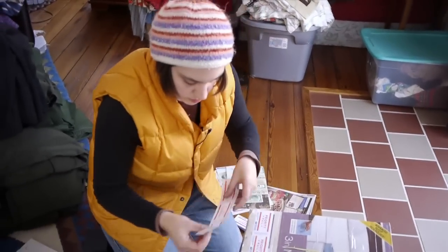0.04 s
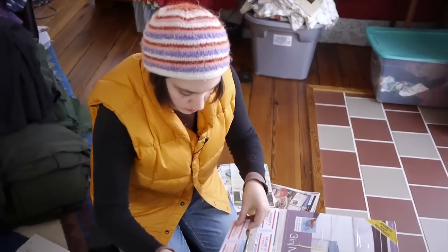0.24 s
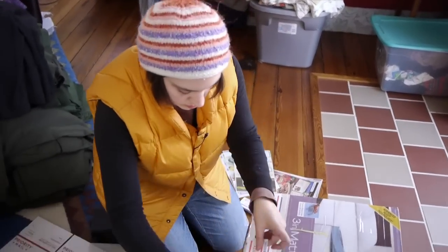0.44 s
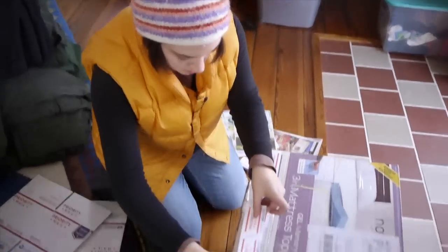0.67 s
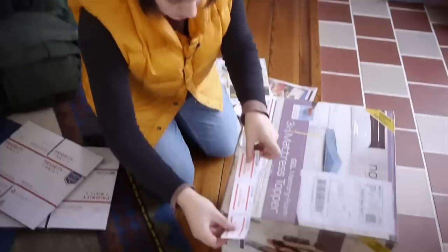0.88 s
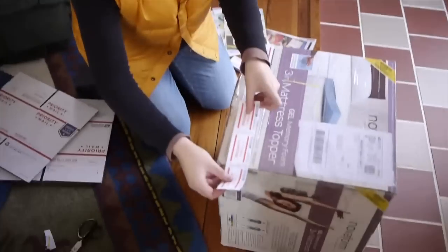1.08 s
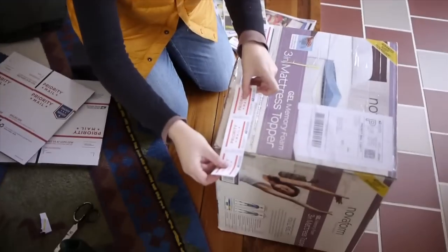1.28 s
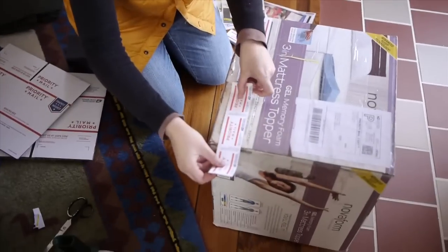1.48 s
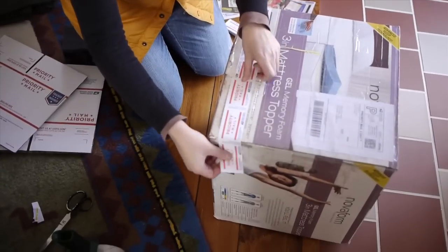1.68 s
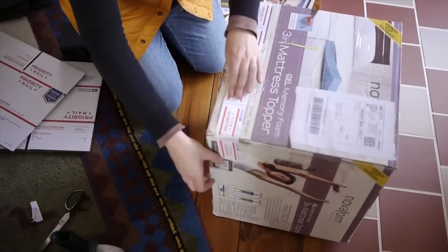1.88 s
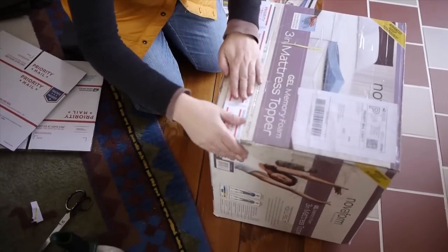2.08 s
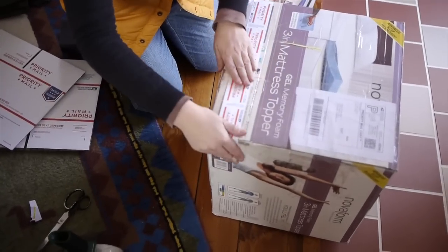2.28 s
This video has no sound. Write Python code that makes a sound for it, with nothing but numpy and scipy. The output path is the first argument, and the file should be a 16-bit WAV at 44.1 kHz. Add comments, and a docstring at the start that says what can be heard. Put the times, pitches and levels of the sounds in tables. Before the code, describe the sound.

A sticker peels off its paper backing with crisp rustling and soft box knocks, then a quiet lull, then sharp crackling taps and a hollow thump on a cardboard box, close-miked in a small quiet room.

```python
"""A sticker label is peeled and laid on a cardboard box in a small, quiet room.
First the backing peels in dense grains of noise, while soft knocks jostle the box and stiff snaps begin.
Paper rustles as the box rumbles and scrapes briefly over the floor; then there is a short lull.
Fingers smooth and tap the label, which cracks, rings and buzzes, and fingertips drag on the cardboard.
Last a flat hand thumps the hollow lid: a bending panel pulse with decaying box modes."""
import sys
import numpy as np
from scipy import signal
from scipy.fft import rfft, irfft, next_fast_len
from scipy.io import wavfile
from scipy.ndimage import uniform_filter1d

SR = 44100
rng = np.random.default_rng(int(sys.argv[2]) if len(sys.argv) > 2 else 0)


def wrap_up_sound(samples):
    """Save the sound to the file named by the first command line argument, as 16-bit audio."""
    columns = np.atleast_2d(samples).T
    # keep every value between -1 and 1, then stretch to whole-number steps
    tamed = np.clip(columns, -1, 1)
    steps = np.round(tamed * 32767).astype(np.int16)
    wavfile.write(sys.argv[1], SR, steps)


N = 102929


def undb(db):
    """Turn decibels into an amplitude factor."""
    return 10 ** (np.asarray(db) / 20)


def unit(x):
    """Scale a sound to an RMS of one."""
    return x / np.sqrt(np.mean(x ** 2) + 1e-20)


def blow(x):
    """Scale a short sound so that its energy equals 5 ms at full level."""
    return x * np.sqrt(0.005 * SR / np.sum(x ** 2))


def colour(x, points, tilt_db=0):
    """Causal minimum-phase filter through (Hz, dB) points, tilted by dB per octave about 4 kHz."""
    size = next_fast_len(2 * len(x))
    hz = np.maximum(np.arange(size // 2 + 1) * SR / size, 1)
    point_hz, point_db = np.array(points, float).T
    gain_db = np.interp(np.log(hz), np.log(point_hz), point_db)
    gain_db = gain_db + tilt_db * np.log2(np.clip(hz, 500, 9000) / 4000)
    # folding the cepstrum onto positive time makes the filter causal
    cepstrum = irfft(np.log(undb(gain_db)), size)
    cepstrum[1:size // 2] *= 2
    cepstrum[size // 2 + 1:] = 0
    response = np.exp(rfft(cepstrum))
    return irfft(rfft(x, size) * response, size)[:len(x)]


def curve(points):
    """Gain that follows (s, dB) points and sits at -120 dB outside them."""
    times, levels_db = np.array(points).T
    return undb(np.interp(np.arange(N) / SR, times, levels_db, left=-120, right=-120))


def fade(t, t60):
    """Exponential decay that falls 60 dB in t60 seconds."""
    return np.exp(-np.log(1000) * t / t60)


def add(out, start_s, x):
    """Mix a short sound into out at its start time."""
    i = max(int(start_s * SR), 0)
    out[i:i + len(x)] += x[:len(out) - i]


def walk(rate_hz):
    """Random levels, rate_hz new ones a second, with straight glides between them."""
    hold = max(int(SR / rate_hz), 1)
    steps = np.repeat(rng.standard_normal(N // hold + 1), hold)
    return unit(uniform_filter1d(steps, hold)[:N])


def friction(levels, points, flutter_db, grains_per_s=6000, spread_db=1.5):
    """Dense tiny slips of fibres, coming in uneven bunches, coloured and faded along a curve."""
    slipping = rng.random(N) < grains_per_s / SR
    strength = undb(spread_db * np.minimum(rng.exponential(size=N), 5))
    slips = slipping * rng.choice([-1, 1], N) * strength
    bunched = slips * undb(flutter_db * walk(180))
    return unit(colour(bunched, points)) * curve(levels)


# spectrum of the quiet room: pitch_hz [Hz], relative_level_db [dB per Hz]
FLOOR_COLOUR = [(15, -82), (25, -57), (43, -4.5), (172, -3.5), (286, -12), (354, -6), (833, -16),
                (15000, -28)]


def room_floor():
    """Steady background of the room: coloured noise at a constant level."""
    return undb(-60.5) * unit(colour(rng.standard_normal(N), FLOOR_COLOUR))


def room_reflections(x):
    """Short, scattered reflections of a furnished room: a noise tail that swells in, then decays."""
    t = np.arange(SR // 2) / SR
    swell = np.minimum(t / 0.0061, 1)
    tail = rng.standard_normal(len(t)) * fade(t, 0.12) * swell
    return signal.fftconvolve(x, tail / np.sqrt(np.sum(tail ** 2)))[:N]


# level curve of the handled box's low rumble: time_s [s], level_db [dB]
RUMBLE_LEVELS = [(0, -50), (.04, -46.5), (.13, -40.5), (.19, -61), (.25, -41.5), (.33, -40), (.42, -68),
                 (.6, -59.5), (.84, -56), (.89, -72), (1.45, -68.5), (1.56, -54.5), (1.7, -58),
                 (1.8, -54.5), (1.87, -39.5), (1.97, -48.5), (2.07, -60), (2.13, -53), (2.19, -39),
                 (2.26, -46.5), (2.37, -72)]
# spectrum of the rumble: pitch_hz [Hz], relative_level_db [dB]
RUMBLE_TONE = [(25, -40), (55, 6), (110, 4), (180, 5), (300, -4.5), (520, -5), (900, -31), (3000, -20)]


def box_rumble():
    """Low rumble of the handled box: slips with strong flutter, coloured towards the bass."""
    return friction(RUMBLE_LEVELS, RUMBLE_TONE, flutter_db=5.0)


# level curve of the box scraping over the floor: time_s [s], level_db [dB]
SCRAPE_LEVELS = [(.2, -55.5), (.3, -55), (.39, -43), (.45, -43), (.54, -43.5), (.62, -48), (.72, -55),
                 (.845, -54.5), (.87, -79)]
# spectrum of the scrape: pitch_hz [Hz], relative_level_db [dB]
SCRAPE_TONE = [(60, -8), (150, -1), (450, 3.5), (800, -0.5), (1200, -4.5), (1820, 0), (2000, 6),
               (2200, 0.5), (2800, -3.5), (3900, -11), (4950, -6.5), (5800, -11), (13000, -24)]


def floor_scrape():
    """Cardboard slipping over the floor in dense, nearly even grains."""
    return friction(SCRAPE_LEVELS, SCRAPE_TONE, flutter_db=0.5)


# level curve of fingers smoothing the label: time_s [s], level_db [dB]
SMOOTH_LEVELS = [(1.25, -66.5), (1.46, -56), (1.53, -54.5), (1.57, -47.5), (1.62, -55), (1.69, -55),
                 (1.8, -56.5), (1.89, -71), (1.94, -39.5), (1.99, -51.5), (2.05, -59), (2.12, -50.5),
                 (2.16, -48), (2.19, -52), (2.23, -51), (2.28, -53.5), (2.37, -39)]
# spectrum of the smoothing: pitch_hz [Hz], relative_level_db [dB]
SMOOTH_TONE = [(100, -1), (400, 12), (900, 7.5), (1800, 4), (3500, 1.5), (8000, 0.5), (11000, -3.5)]


def finger_smoothing():
    """Fingers rubbing the label flat: dense slips with light flutter."""
    return friction(SMOOTH_LEVELS, SMOOTH_TONE, flutter_db=1.0)


# level curve of fingertips dragging on the cardboard: time_s [s], level_db [dB]
DRAG_LEVELS = [(1.82, -70), (1.865, -54), (1.875, -51), (1.91, -38), (1.935, -47), (1.97, -54.5),
               (2.04, -65), (2.1, -58.5), (2.135, -46.5), (2.15, -46), (2.19, -74)]
# spectrum of the drag: pitch_hz [Hz], relative_level_db [dB]
DRAG_TONE = [(150, -3), (350, 1), (510, 10), (700, -7), (1100, -23), (1650, 7), (2200, -14), (4000, -18),
             (8000, -14)]


def fingertip_drag():
    """Fingertips catching on cardboard: slips in markedly uneven bunches."""
    return friction(DRAG_LEVELS, DRAG_TONE, flutter_db=4.0)


# level curve of the paper rustle, before the treble trim: time_s [s], level_db [dB]
RUSTLE_LEVELS = [(.19, -57), (.23, -45.5), (.3, -37.5), (.36, -37.5), (.4, -40.5), (.47, -45.5),
                 (.65, -62.5), (.88, -68.5)]
# spectrum of the rustle, before the treble trim: pitch_hz [Hz], relative_level_db [dB]
RUSTLE_TONE = [(200, 6), (700, -4), (1500, -5.5), (3000, -4), (5500, -4.5), (7200, 2), (9400, 2.5),
               (11000, -1.5)]
# treble trim of the rustle: pitch_hz [Hz], gain_db [dB]
RUSTLE_TREBLE = [(11000, 0), (14000, -5)]


def paper_rustle():
    """Handled paper: sparser slips of more varied strength, with the extreme treble trimmed."""
    rustle = friction(RUSTLE_LEVELS, RUSTLE_TONE, flutter_db=0.4, grains_per_s=3500, spread_db=2)
    return colour(rustle, RUSTLE_TREBLE)


# level curve of the sticker peeling off its backing: time_s [s], level_db [dB]
PEEL_LEVELS = [(0, -49), (.03, -40), (.055, -39.5), (.09, -42), (.14, -41.5), (.17, -50.5), (.2, -65)]
# spectrum of the peel: pitch_hz [Hz], relative_level_db [dB]
PEEL_TONE = [(200, -10), (700, -5), (1500, -5), (3000, -5), (5500, -8.5), (7200, 4.5), (9200, -2),
             (10500, -2.5)]


def sticker_peel():
    """The sticker letting go of its backing in dense, nearly even grains."""
    return friction(PEEL_LEVELS, PEEL_TONE, flutter_db=0.3)


# fingers and palm on the box: start_s [s], level_db [dB], panel_pitch_hz [Hz, where the bend settles],
# swing_cycles [cycles until the swing falls to 1/e, before the attack], ring_db [dB re panel]
BOX_KNOCKS = [(0.021, -31.5, 163.7, 3, -8.5), (0.033, -28.5, 153.7, 6.5, -1.5), (.05, -30.5, 127, 2.8, -8),
              (.066, -23, 105, 1.6, -11), (.078, -28.5, 110, 0.9, -28), (0.124, -32, 102, 3, -22),
              (.143, -43, 505, 5.4, -7), (.258, -35.5, 240, 5.1, -5), (0.273, -34, 139, 2.3, -12),
              (.297, -30, 170, 4.5, 0), (0.313, -25, 122, 1.8, -8), (0.344, -25.5, 139, 2, -4.5),
              (0.345, -36, 318, 1.6, -2), (0.37, -34, 150, 2, -6), (0.443, -46, 224, 1.8, 3),
              (1.504, -39, 885, 0.7, -6), (1.5044, -28, 390, 1.7, -6), (1.54, -30, 82.5, 0.86, -9),
              (1.5412, -32.5, 396, 3, -4.5), (1.627, -44, 97.5, 2.4, -12), (1.666, -59, 400, 1.1, 5),
              (1.87, -32, 500, 2.8, -5), (1.8959, -36.5, 420, 1.4, 3), (1.922, -41, 302, 1.6, 5.5),
              (1.951, -42.5, 118, 1.5, 0), (2, -38, 109, 2.2, -13), (2.1363, -12.5, 187.6, 1.64, -6.5),
              (2.137, -21, 469, 4.1, -6.5), (2.164, -21.5, 298, 5.5, -5.5), (2.176, -25.5, 138, 2.2, -5),
              (2.203, -40.5, 222, 4.1, 5.5), (2.213, -48.5, 100, 1.5, -4)]
# modes of the hollow cardboard box: pitch_hz [Hz], relative_level_db [dB], t60_s [s]
HOLLOW_MODES = [(93, -6.5, 0.17), (109, 3.5, 0.05), (162, -0.5, 0.075), (202.4, -2, 0.026),
                (229, 4.5, 0.055), (299.8, 2.5, 0.064), (361, -2.5, 0.048), (448, -14, 0.033),
                (493, -1.5, 0.058), (533, -12, 0.018), (690, -2, 0.08), (980, -20, 0.015), (1300, 9, 0.021)]
BEND_RISE, BEND_CYCLES, ATTACK_CYCLES = 1.14, 0.47, 0.68  # rise is a fraction of the panel pitch
MODE_WIDTH = 1  # of the modes that are woken, relative to the panel pitch
LOW_CUT_HZ = 77


def box_knocks():
    """Each blow swings the cardboard panel a few falling cycles and wakes box modes near that pitch."""
    out, t = np.zeros(N), np.arange(SR // 4) / SR
    for start_s, level_db, panel_hz, swing_cycles, ring_db in BOX_KNOCKS:
        cycles = panel_hz * t
        attack = 1 - np.exp(-cycles / ATTACK_CYCLES)
        # fast bending waves arrive first, so the pitch starts high
        phase = cycles + BEND_RISE * BEND_CYCLES * (1 - np.exp(-cycles / BEND_CYCLES))
        panel = np.sin(2 * np.pi * phase) * attack * np.exp(-(cycles / swing_cycles) ** 1.27)
        ring = np.zeros(len(t))
        for mode_hz, mode_db, t60_s in HOLLOW_MODES:
            detuning = (mode_hz / panel_hz - panel_hz / mode_hz) / MODE_WIDTH
            woken = undb(mode_db) / np.hypot(1, detuning)
            start_phase = 2 * np.pi * rng.random()
            ring += woken * np.sin(2 * np.pi * mode_hz * t + start_phase) * fade(t, t60_s)
        knock = blow(panel) + undb(ring_db) * blow(ring * attack ** 2)
        add(out, start_s, undb(level_db) * knock)
    return signal.sosfilt(signal.butter(2, LOW_CUT_HZ, "high", fs=SR, output="sos"), out)


# snaps and crackles of the label: start_s [s], level_db [dB, before colouring],
# tilt_db [dB per octave, 500 Hz to 9 kHz; crack and buzz only], top_octave_db [dB at 11.5 kHz and up],
# decay_ms [ms, time constant of the crack], ring_db [dB re crack, before colouring]
LABEL_SNAPS = [(0.0985, -46, 16, -8, 2.1, -21), (.1042, -34, 12.5, -13, 0.92, -18),
               (.1265, -35.5, 7.5, -4, 1.8, -12), (0.1284, -33.5, 11, -6, 1.6, -8),
               (.1803, -38, -4, -14, 0.42, -13), (.2925, -29, -5.5, -8, 1, -12),
               (0.405, -22, 1, -1.5, 3.3, -16), (.655, -38, -2.5, -2, 0.67, -11.5),
               (1.5012, -46, 5, -11, 0.65, -20), (1.5043, -34, -10, 2, 0.91, -18),
               (1.5105, -39.5, 0.5, -1, 0.23, 1), (1.5244, -38, 2.5, 1, 0.65, -8),
               (1.534, -27.5, -4.5, 10, .7, -4.5), (1.539, -17, -2.5, -8, 1.6, -6.5),
               (1.5397, -15.5, -2, 8, 0.68, -13), (1.666, -26.5, -4, 1.5, 1.4, -40),
               (1.683, -52, 5, 9, 1.3, -22), (1.7738, -40.5, 1, 2.5, 0.53, -20),
               (1.777, -45, 7, -3, 0.53, -17), (1.8313, -39.5, 3, -9, 1.7, -16),
               (1.868, -17.5, -2, -4.5, 0.5, -30), (1.872, -33.5, -2, -9, 0.23, -12),
               (1.8965, -32.5, -3, 0, 0.65, -9), (1.8986, -30, -1.5, -3, .6, -25),
               (1.9118, -41, -6, 18, 1.2, 3.5), (1.9183, -20, -0.5, -6, 0.94, -18),
               (1.9191, -17.5, -1.5, -3, 2.1, -12), (1.935, -31, -5.5, 13, 1, -7),
               (2.138, -22.5, -3, -2, 4.2, -8.5), (2.1641, -28.5, 1, -4, 2.4, -16),
               (2.222, -33, 1, -5, 4.3, -6.5), (2.235, -39, 0, -7, 1.6, -14),
               (2.2624, -31, -2, 2.5, 0.55, -11)]
# filter on crack and buzz, before each snap's tilt: pitch_hz [Hz], gain_db [dB]
SNAP_TONE = [(100, -19), (500, -12), (1000, -15), (2000, -8), (4000, -6.5), (8000, -3), (10000, -5.5)]
# modes of the stiff label on the lid: pitch_hz [Hz, before a small random detune],
# relative_level_db [dB], t60_s [s]
STIFF_LABEL_MODES = [(1690, -9, .07), (2370, -8, .06), (3150, -4, .08), (3280, -2, .09), (3500, -1, .09),
                     (3590, -3, .08), (4090, -5, .07), (4490, 0, .1), (5400, -5, .06), (5600, -3, .07),
                     (5750, -5, .06), (7550, -4, .06), (7900, -3, .07)]
MODES_DB, BUZZ_FLUTTER_DB, BUZZ_T60_S = -7, -1, 0.052  # modes: dB re the snap's ring_db


def label_snaps():
    """Each snap is a brief crack, after which the label rings and buzzes against the lid."""
    out, t = np.zeros(N), np.arange(SR // 5) / SR
    for start_s, level_db, tilt_db, top_octave_db, decay_ms, ring_db in LABEL_SNAPS:
        age = t * 1e3 / decay_ms
        crack = blow(rng.choice([-1., 1.], len(t)) * np.exp(-age) * (1 - np.exp(-age / 0.28)))
        ring = np.zeros(len(t))
        for mode_hz, mode_db, t60_s in STIFF_LABEL_MODES:
            polarity = np.sign(rng.standard_normal())
            detuned_hz = mode_hz * (1 + 0.0087 * rng.standard_normal())
            ring += undb(mode_db) * polarity * np.sin(2 * np.pi * detuned_hz * t) * fade(t, t60_s)
        flutter = undb(BUZZ_FLUTTER_DB * walk(690)[:len(t)])
        buzz = blow(rng.standard_normal(len(t)) * flutter * fade(t, BUZZ_T60_S))
        snap = colour(crack + undb(ring_db) * buzz, SNAP_TONE, tilt_db)
        snap += undb(ring_db + MODES_DB) * blow(ring)
        snap = colour(snap, [(9500, 0), (11500, top_octave_db)])
        add(out, start_s, undb(level_db) * snap)
    return out


def scene():
    """Paper, box and fingers close by, over a quiet room that reflects the snaps and knocks."""
    snaps, knocks = label_snaps(), box_knocks()
    background = room_floor() + room_reflections(undb(-17.5) * snaps + undb(-16.5) * knocks)
    sliding = box_rumble() + floor_scrape()
    fingers = finger_smoothing() + fingertip_drag()
    paper = paper_rustle() + sticker_peel()
    return (background + sliding + fingers + paper + knocks + snaps)[None]


def record(dry):
    """The recorder rounds the highest peaks and cuts the top above 15.8 kHz."""
    peak_limit = 0.7
    rounded = peak_limit * np.tanh(dry / peak_limit)
    return signal.sosfilt(signal.ellip(10, 0.2, 70, 15800, fs=SR, output="sos"), rounded)


dry = scene()
out = record(dry)
wrap_up_sound(out)
```